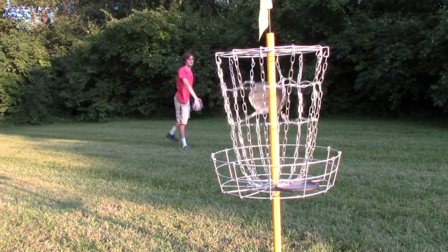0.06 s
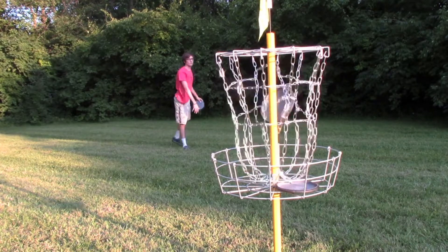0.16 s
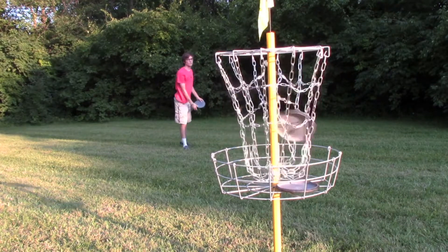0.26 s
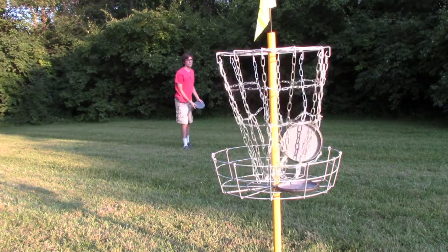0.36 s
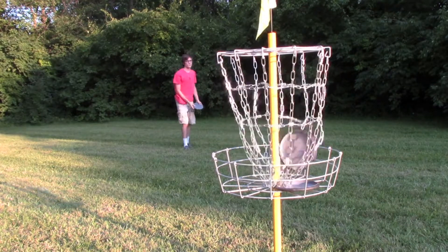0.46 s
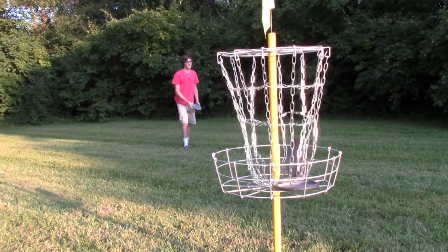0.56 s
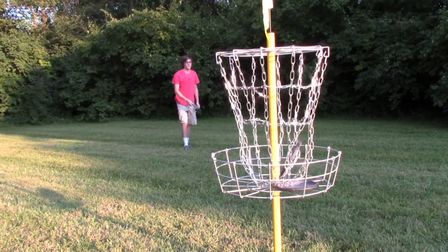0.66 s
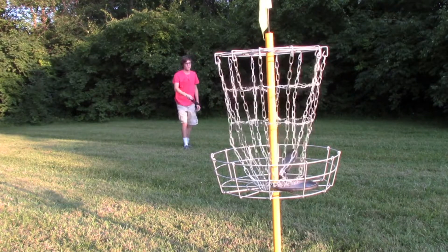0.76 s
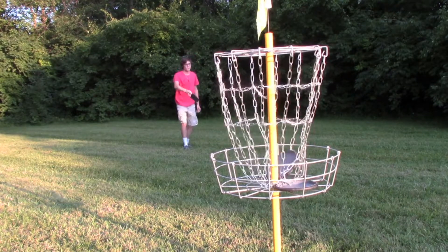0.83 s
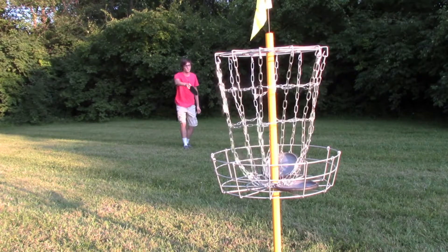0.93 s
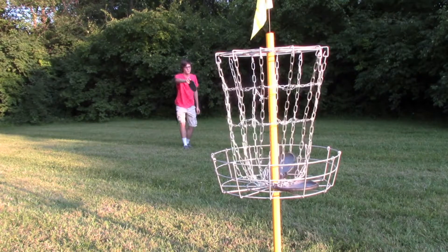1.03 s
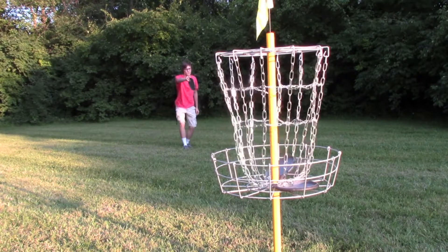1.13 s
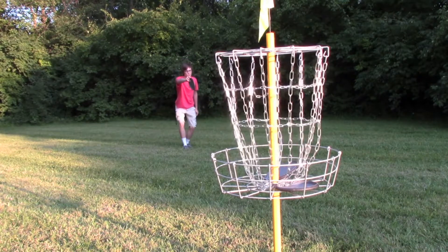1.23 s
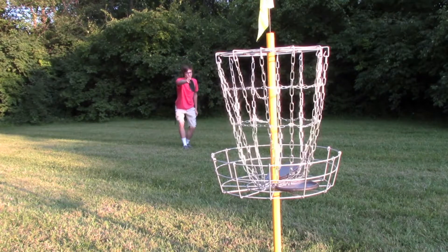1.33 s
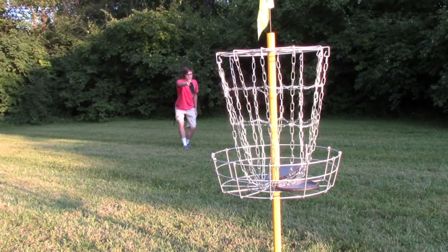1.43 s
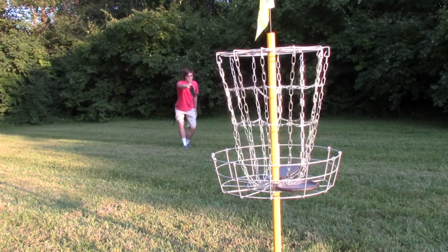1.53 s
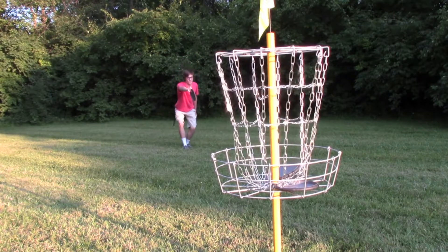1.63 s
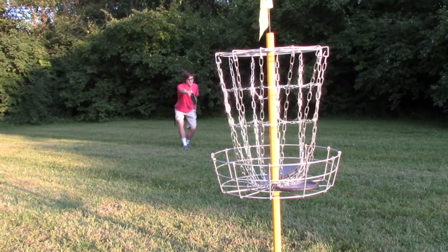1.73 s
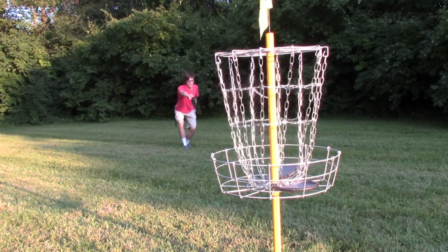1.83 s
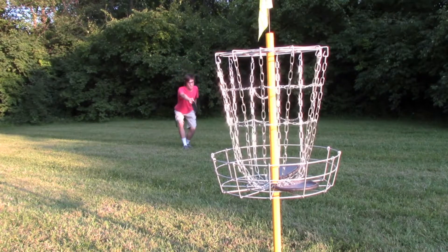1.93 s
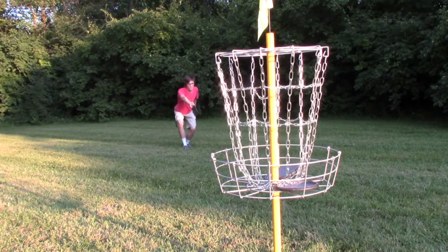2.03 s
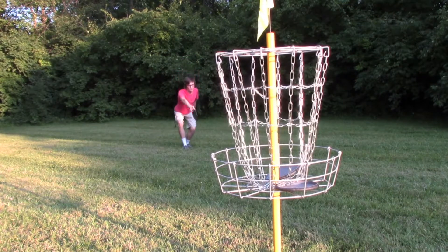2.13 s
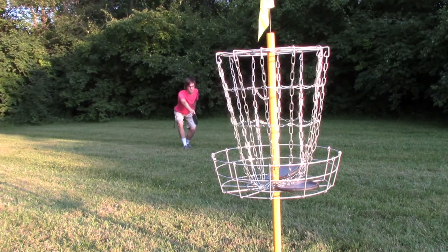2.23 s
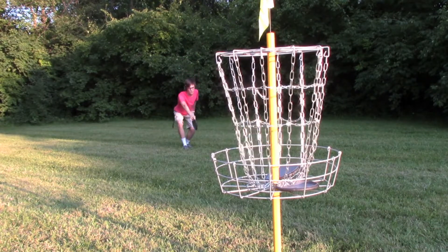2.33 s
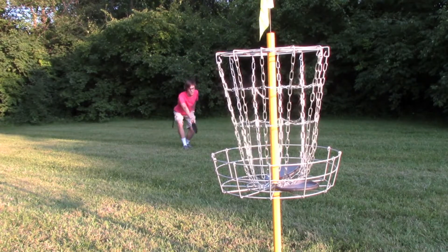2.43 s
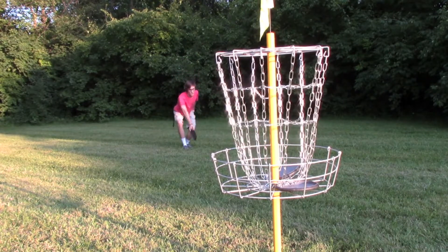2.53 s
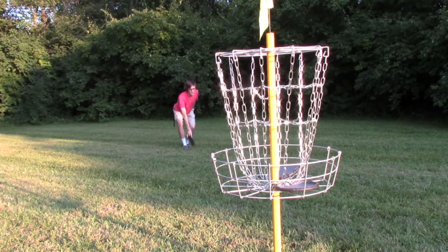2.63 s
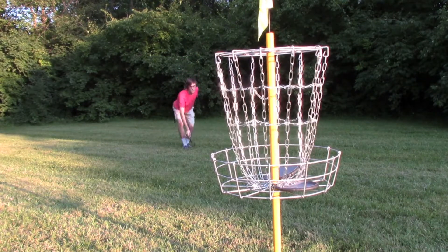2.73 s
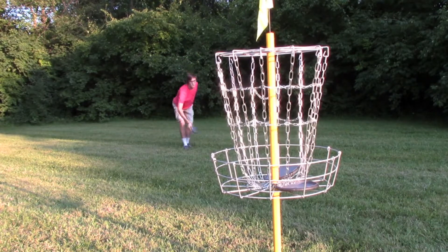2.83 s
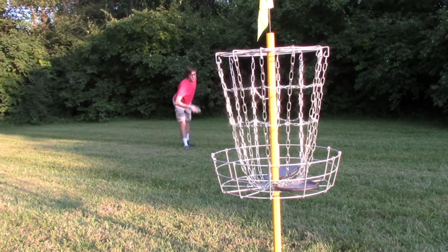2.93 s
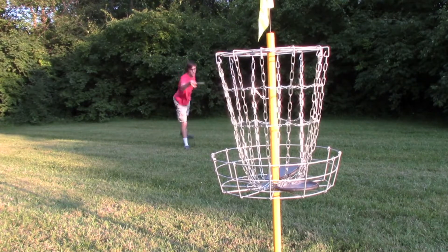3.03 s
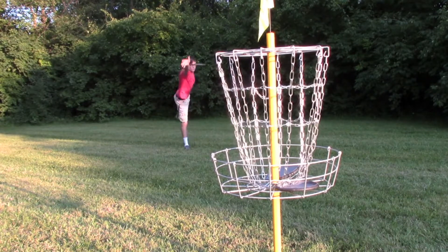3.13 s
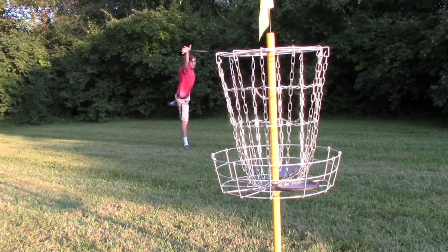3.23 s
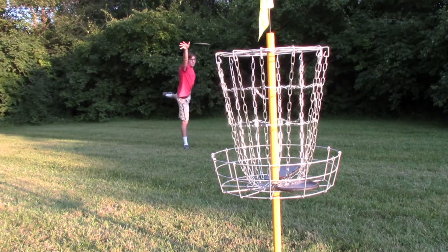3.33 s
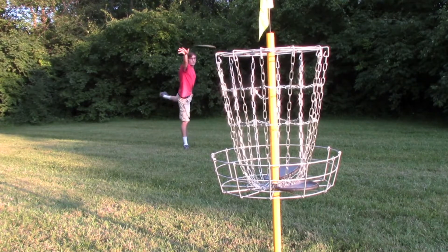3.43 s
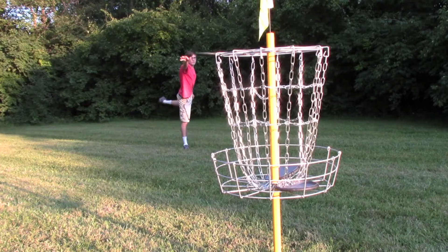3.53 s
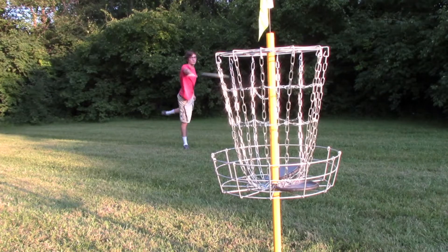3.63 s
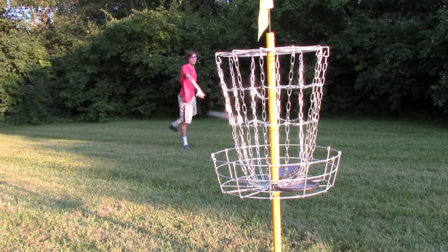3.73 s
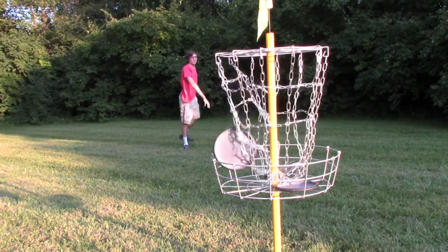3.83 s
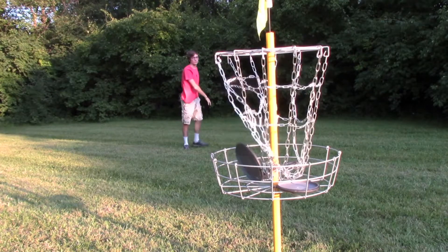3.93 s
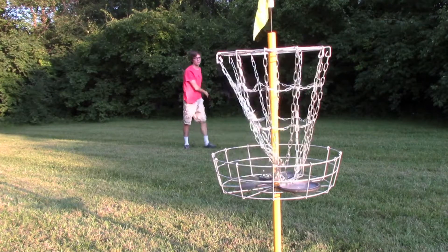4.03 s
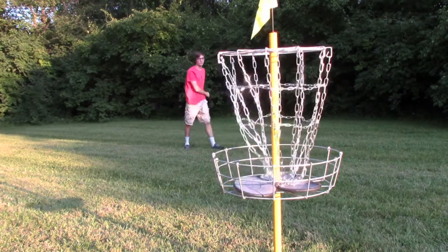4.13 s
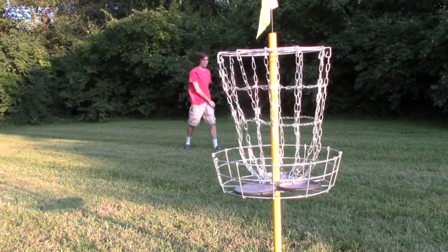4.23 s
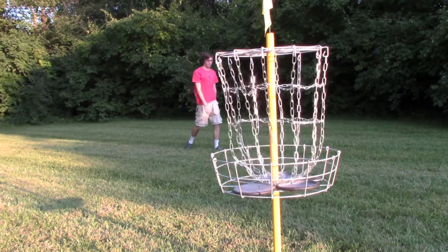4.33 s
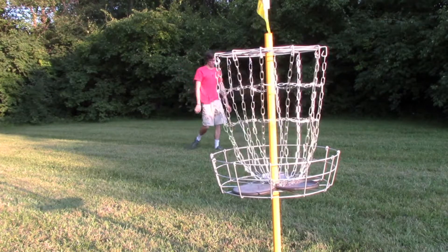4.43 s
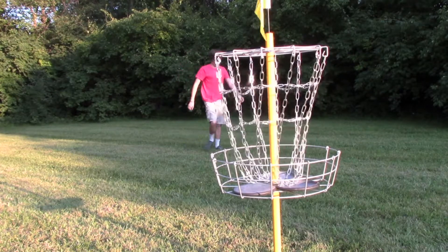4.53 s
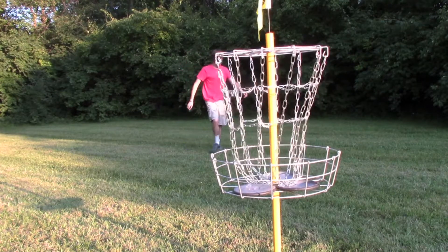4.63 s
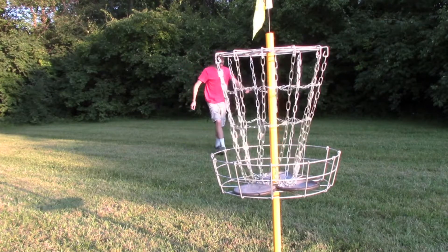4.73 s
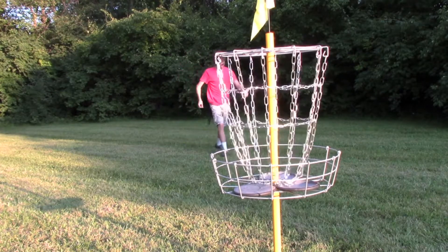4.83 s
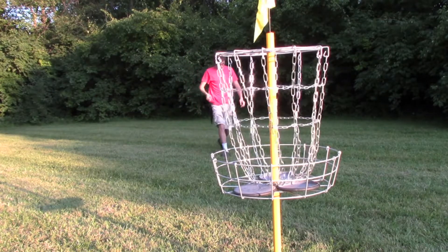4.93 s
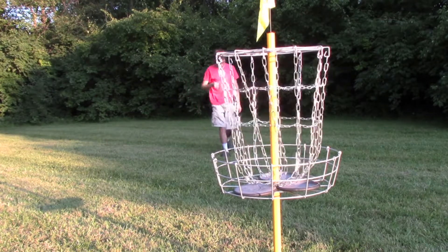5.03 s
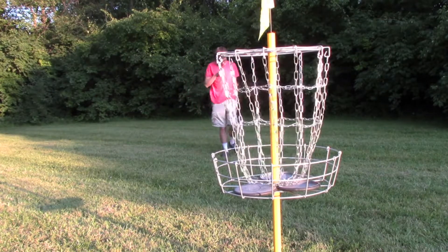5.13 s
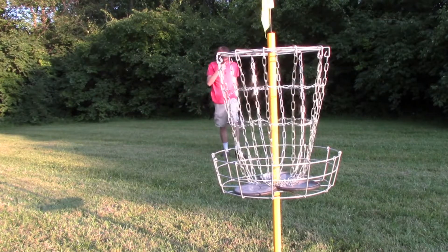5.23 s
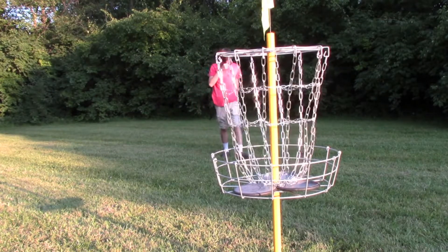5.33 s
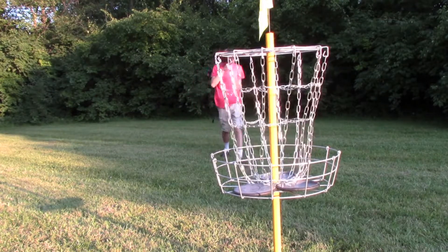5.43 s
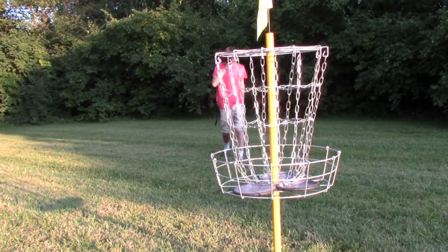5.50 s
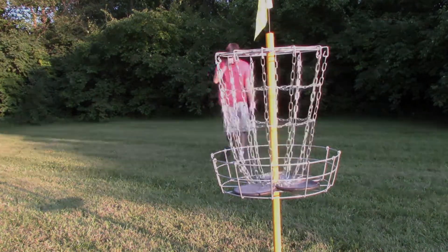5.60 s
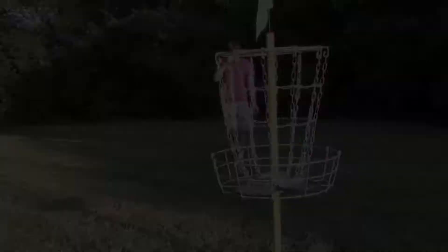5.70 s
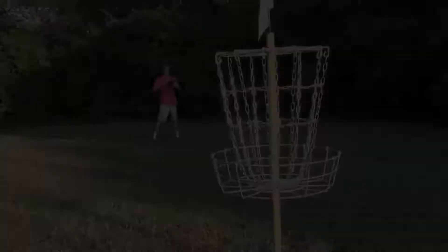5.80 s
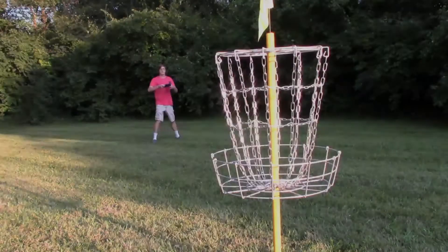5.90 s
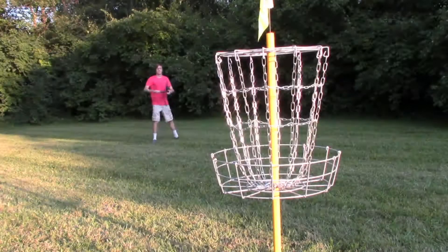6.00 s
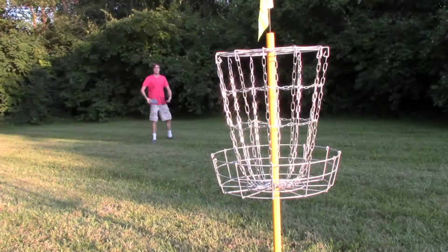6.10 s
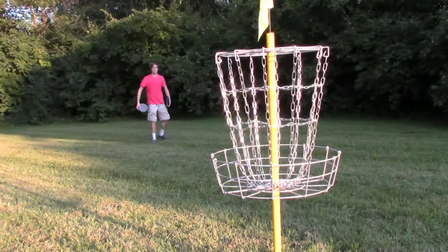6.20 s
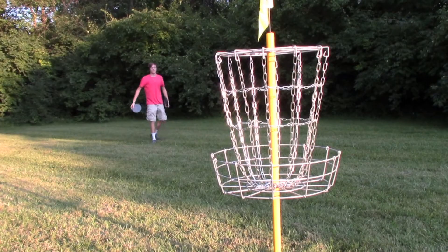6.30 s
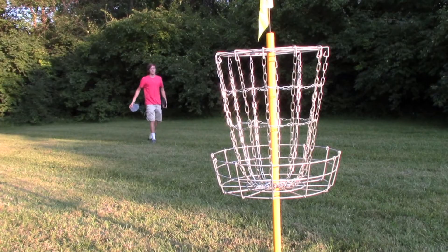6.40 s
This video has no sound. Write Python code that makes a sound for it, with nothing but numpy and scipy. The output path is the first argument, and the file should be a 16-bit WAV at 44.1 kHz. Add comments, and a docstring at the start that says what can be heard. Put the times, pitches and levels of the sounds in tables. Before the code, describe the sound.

Close outdoor perspective beside a metal chain basket: a disc slaps in almost at once, with hollow plastic knocks, a rush of jingling links and a high ringing metal hoop. Stray clinks slow and fade into pulsing insect buzz and soft distant rumble. A second disc crashes in, knocks down into the tray, and the chains clatter on irregularly. Finally the sound dips out for a moment, then only insects remain.

```python
"""A plastic disc slaps the chains of a steel disc-golf basket on a summer field; a second one follows.
The chains are showers of randomly excited link modes; the ring that gathers them clangs on the pole,
and both ring as sums of decaying sinusoids. Discs are damped thuds with noise slaps, rakes are sparse noise.
Stray links clink as the chains settle, over pulsed-noise insects and a far rumble of filtered noise."""
import sys
import numpy as np
from scipy import signal
from scipy.fft import rfft, irfft
from scipy.io import wavfile
from scipy.ndimage import uniform_filter1d

SR = 44100
rng = np.random.default_rng(int(sys.argv[2]) if len(sys.argv) > 2 else 0)


def generate_wav(signal):
    """Clip the signal to [-1, 1] and save it as 16-bit WAV at the path in sys.argv[1]."""
    frames = np.transpose(np.atleast_2d(signal))
    scaled = np.clip(frames, -1, 1) * 32767
    pcm = np.round(scaled).astype(np.int16)
    wavfile.write(sys.argv[1], SR, pcm)


N = 284877
T = np.arange(N) / SR

# Levels in the tables are relative: each source applies its own gain.
# The ring meets the pole:
# (time [s], clang level [dB], hum level [dB], shimmer level [dB], pole level [dB])
CLANGS = [(0.133, -7.5, -24, -11, -21), (0.175, -6.5, -26, -14, -22), (0.218, -7, -22, -8.5, -20),
          (0.2884, -3.5, -25, -9, -21.5), (0.3724, -5.5, -30, -11.5, -19), (0.4346, -6.5, -31.5, -10, -16),
          (0.483, -10, -21, -15, -33), (0.518, -5, -20.5, -19.5, -20), (0.587, -10.5, -23, -28, -19.5),
          (3.7735, -6.5, -20, -9.5, -27.5), (3.82, -6.5, -16, -17, -32.5),
          (3.8744, -6.5, -14, -17.5, -27.5), (3.95, -14.5, -18.5, -17.5, -43.5),
          (4.013, -7.5, -26, -13, -20), (4.1152, -12.5, -34, -12.5, -19.5), (4.1844, -18, -33.5, -28, -20),
          (4.2494, -21.5, -32.5, -26, -24), (4.5014, -12.5, -41, -24, -13), (4.6023, -16, -39, -34, -37)]
# Bending modes of the ring, each split into close, beating tones: (frequency [Hz], level [dB], t60 [s])
HUM_MODES = [(1966, 0, 2.9), (1990, -5, 2.9)]
CLANG_MODES = [(5546, -1, .6), (5566, -10, .8), (5587, -4, .75), (5615, -3, .8), (5649, -9, .7),
               (5696, -10, .7), (5745, -17, .5), (5800, -20, .4)]
SHIMMER_MODES = [(10698, -3, .35), (10729, -2, .35), (10765, -4, .35), (10882, -8, .5), (10972, -10, .4),
                 (11084, -10, .35), (11208, -14, .3)]
# The hum's upper twin varies about half as much in dB as the hum itself:
# level at full hum [dB], slope [dB per dB of hum]
TWIN_DB, TWIN_SLOPE = -10, 0.54
# Modes of the steel pole: (frequency [Hz], level [dB], t60 [s])
POLE_MODES = [(2121, -12, .8), (2379, -11, .5), (3386, 0, .3), (4124, -2, .32), (4985, -5, .3),
              (5890, -5, .2), (6078, -6, .3), (6275, -10, .33), (6589, -4, .3), (6928, -3, .26),
              (7368, -4, .2), (7860, -1, .17), (8050, -6, .22), (8400, -4, .3), (8965, -4, .15),
              (9615, -12, .15), (10341, -9, .13), (11547, -10, .13), (12010, -11, .12)]

# A chain snaps tight and stirs its neighbours:
# (time [s], jingle level [dB], clatter level [dB], t60 of the stir [s])
CLINKS = [(0.586, -12.5, -17.5, .2), (0.703, -12.5, -18, 1), (0.76, -9, -20, 0.14), (0.829, -28, -35, 0.15),
          (0.936, -16, -33, 0.41), (1.122, -18.5, -26.5, 1), (1.17, -19, -27, .5), (1.259, -20, -34, 0.17),
          (1.3016, -32, -50, .3), (1.466, -16.5, -33, 0.18), (1.7288, -34, -45, 0.34),
          (1.7697, -30.5, -37, 0.22), (1.845, -25, -33.5, 0.33), (1.9293, -32.5, -32, 0.22),
          (2.093, -29.5, -36.5, 0.18), (2.225, -30, -33.5, 0.22), (2.345, -35, -40, 0.45),
          (2.8563, -33.5, -39, .2), (4.1841, -5, -20, 0.22), (4.317, -11, -24.5, 0.33),
          (4.3527, -13.5, -22.5, 0.28), (4.4082, -18.5, -28, 0.23), (4.4995, -15, -22.5, .25),
          (4.602, -9.5, -20, .3), (4.7263, -22.5, -34, 0.6), (4.8185, -20.5, -23.5, .9),
          (4.9168, -16, -24.5, 0.1), (5.164, -29.5, -35.5, 0.14), (5.234, -18.5, -30.5, 0.45),
          (5.5245, -35, -39, 0.69)]
# The stir, relative to its clink [dB]
STIR_DB, STIR_CLATTER_DB = -24.5, -8
# Faint stray clinks as the chains settle: (start [s], end [s], jingle level [dB], clatter level [dB])
SETTLING = [(1.999, 3.05, -42.5, -41.5), (5.295, 5.55, -40.5, -40.5)]
STRAYS_PER_S, STRAY_SPREAD_DB = 7, 0.5
# Tones that all links share, roughly: (frequency [Hz], level [dB])
LINK_MODES = [(1590, 1), (1740, 0.5), (2830, -4.5), (3000, -13), (3470, 3), (3750, 1.5), (4450, 3.5),
              (7400, -3), (8200, -8), (8395, 8.5), (8770, 0), (10900, 4), (13330, 9.5), (13780, -4)]
# Spectra of the bright jingle, dull clatter, hard-contact edge and lone clink: (frequency [Hz], level [dB])
BRIGHT_SPECTRUM = [(4500, -29), (6500, 6.5), (7800, 7), (8500, 0.5), (9400, 2.5), (11300, -4.5),
                   (12800, -14), (15000, -13.5), (16000, -18.5)]
DULL_SPECTRUM = [(80, -60), (250, -9), (600, -5.5), (850, 1.5), (1200, -5), (1600, 1.5), (2100, 0),
                 (2800, 3.5), (3700, 0), (5000, -2.5), (7500, 5), (10000, -33)]
EDGE_SPECTRUM = [(6000, -34), (9500, 0), (11800, 4), (13300, -15.5), (15000, -4.5), (16000, -18)]
CLINK_SPECTRUM = [(4500, -31.5), (6500, -9), (7800, 5.5), (8500, 1), (9400, 1.5), (11300, -5),
                  (12800, -8.5), (15000, -10), (16000, -14)]
# Instants at which a throw sets the chains shaking: (time [s])
THROW_TIMES = [0.058, 3.726]
# The shaking after each throw: (level [dB], hold [s], fall [dB/s])
THROWS = [(-27.5, 0.48, 35), (-28.5, .52, 82)]
# The chains swing together and apart; the shaking swells once a swing
SWING_S, SWING_DB, SHAKE_ATTACK_S = 0.39, 1, .02
# Clatter fades more slowly than jingle: level at full shake [dB], slope [dB per dB of shake]
CLATTER_DB, CLATTER_SLOPE = -15, .55
# A link swings free and rings one clear tone: (time [s], frequency [Hz], level [dB], t60 [s])
PINGS = [(0.757, 8200, -27.5, 0.16), (0.758, 1583, -26, 0.11), (1.26, 8320, -26, 0.093),
         (4.316, 8420, -20.5, 0.27), (4.352, 8410, -20, 0.26), (4.916, 4460, -27, 0.16),
         (5.236, 1550, -38, 0.17)]

# The flying disc rakes across the chains: (time [s], level [dB], t60 [s])
RAKES = [(0.059, -16, 0.21), (0.098, -14, 0.6), (3.726, -19, 0.066), (3.7405, -16, 0.49)]
# Spectrum of a rake: (frequency [Hz], level [dB])
RAKE_SPECTRUM = [(3000, -14.5), (5500, -6), (7000, 1), (8500, -1), (10200, 1.5), (11800, -4),
                 (13300, -17.5), (15000, -12)]
# A disc strikes chains or tray: (time [s], thud level [dB], slap level [dB], thud pitch [Hz])
DISCS = [(0.057, -31.5, -17, 677), (0.073, -14.5, -22, 494), (0.096, -7.5, -14.5, 507),
         (0.141, -30, -29.5, 473), (0.217, -29.5, -32.5, 497), (0.515, -16, -25.5, 522),
         (3.725, -38.5, -18.5, 670), (3.74, -28, -21.5, 547), (3.785, -24.5, -24.5, 502),
         (4.004, -20, -45.5, 263)]
# Nominal modes of the disc's body: (multiple of thud pitch [1], level [dB], t60 [s])
DISC_MODES = [(.8, -12, 0.18), (1.002, 13, .08), (1.2, -13.5, 0.022), (1.701, -3.5, 0.12)]
# Spectrum of the slap: (frequency [Hz], level [dB])
SLAP_SPECTRUM = [(80, -69.5), (280, -12.5), (550, -10.5), (900, -0.5), (1400, -4), (2000, -6), (2900, -3.5),
                 (4500, -10), (9000, -29)]
# A disc tumbles down the chains in soft knocks, loudest midway:
# (time [s], length [s], thud level [dB], slap level [dB], thud pitch [Hz])
TUMBLES = [(0.279, .14, -19.5, -26, 515), (3.973, 0.107, -19.5, -28.5, 540)]
# Mean spacing, timing spread, pitch spread (natural log) and base taper at the ends of a tumble
KNOCK_GAP_S, KNOCK_JITTER_S, KNOCK_PITCH_SPREAD, KNOCK_TAPER_DB = .032, 0.0024, .12, 4

# Spectra of the insects and the open field: (frequency [Hz], level [dB per Hz])
INSECT_SPECTRUM = [(3900, -35), (4500, -16.5), (5000, -9), (5500, -11), (5750, -4), (6250, -2.5),
                   (6850, -10.5), (7300, -9), (7900, -16), (8600, -31), (12000, -33), (16000, -37)]
FIELD_SPECTRUM = [(15, -77), (25, -36), (59, -13.5), (117, -2), (227, -4.5), (264, -8.5), (406, -11.5),
                  (442, -12), (472, -7), (548, -11), (999, -10), (1260, -14), (1600, -16.5), (2110, -23.5),
                  (4200, -34), (5460, -46.5), (9240, -120)]
INSECTS_DB, FIELD_DB = -48, -45
# Gain of the sample-to-sample slope that sets the two channels apart [dB]
RING_SIDE_DB, BASKET_SIDE_DB = -26.5, -47
# The level dips briefly: (time [s], gain [1])
FADE = [(5.6, 0.96), (5.83, 0.0072), (6.06, 0.86)]
TOP_HZ = 15750


def amp(db):
    """Decibel law: 20 dB are a factor of ten in amplitude."""
    return 10 ** (np.asarray(db) / 20)


def unit(x):
    """Normalisation: scale to an rms of 1."""
    return x / np.sqrt(np.mean(x ** 2))


def decay(t, t60):
    """Exponential damping: fall by 60 dB in t60 seconds."""
    return np.exp(-np.log(1000) * t / t60)


def colour(x, points):
    """Minimum-phase filtering: a folded cepstrum turns (Hz, dB) points into a causal response."""
    size = 4096
    hz, db = np.transpose(points)
    bins_hz = np.arange(size // 2 + 1) * SR / size
    gain = amp(np.interp(np.log(bins_hz + 1), np.log(hz), db))
    cepstrum = irfft(np.log(gain))[:size // 2]
    cepstrum[1:] *= 2
    response = irfft(np.exp(rfft(cepstrum, size)))
    return signal.fftconvolve(x, response)[:len(x)]


def highpass(x, hz):
    """Radiation efficiency: small bodies radiate little bass."""
    return signal.sosfilt(signal.butter(3, hz, "high", fs=SR, output="sos"), x)


def walk(rate):
    """Band-limited fluctuation: smoothed random steps with a spread near 1."""
    k = int(SR / rate)
    steps = np.repeat(rng.standard_normal(N // k + 1), k)
    return uniform_filter1d(steps, k)[:N] * np.sqrt(3 / 2)


def add(out, s, sound):
    """Superposition: mix a sound in at a given time."""
    i = int(s * SR)
    out[i:i + len(sound)] += sound[:N - i]


def struck(times, blow_db, modes, kick, chatter):
    """Modal re-excitation: each contact restarts the swing and shifts its phase; riding links add chatter."""
    out = np.zeros(N)
    blow = np.maximum(np.searchsorted(times, T) - 1, 0)
    age = np.maximum(T - times[blow], 0)
    for hz, db, t60 in modes:
        level = amp(blow_db + db)[blow] * decay(age, t60) * (T > times[0])
        swing = uniform_filter1d(level, size=90)  # about 2 ms: softens the joins
        shifts = np.cumsum(kick * rng.standard_normal(len(times)))
        phase = uniform_filter1d(shifts[blow], size=90)
        phase += chatter * walk(420) * decay(age, 1.2)
        out += swing * np.sin(2 * np.pi * (hz * T + rng.random()) + phase)
    return out


def steel_ring():
    """Bending vibration of a ring: split modes beat, and the lowest tones sing on longest."""
    s, clang_db, hum_db, shimmer_db, _ = np.transpose(CLANGS)
    hum = struck(s, hum_db + 1.5, HUM_MODES[:1], kick=.35, chatter=.06)
    twin = struck(s, TWIN_DB + TWIN_SLOPE * hum_db, HUM_MODES[1:], kick=.35, chatter=.06)
    clang = struck(s, clang_db - 6.5, CLANG_MODES, kick=0.74, chatter=0.2)
    shimmer = struck(s, shimmer_db - 1.5, SHIMMER_MODES, kick=1.1, chatter=0.3)
    return hum + twin + clang + shimmer


def pole():
    """Linear impulse response: blows, each with a brief scrape, excite modes that add up and die away."""
    force, tube, t = np.zeros(N), np.zeros(SR), np.arange(SR) / SR
    for s, *_, db in CLANGS:
        contact = 0.017 * rng.standard_normal(len(t)) * decay(t, 0.42)
        contact[0] += 1
        add(force, s, amp(db - 4.5) * contact)
    for hz, db, t60 in POLE_MODES:
        tube += amp(db) * decay(t, t60) * np.sin(2 * np.pi * (hz * t + rng.random()))
    ringing = signal.oaconvolve(force, highpass(tube, 1500))[:N]
    # chains lying against the tube roughen its tones
    return np.real(signal.hilbert(ringing) * np.exp(.25j * walk(350)))


def link(t60, tick, detune, count):
    """Modal sum: shared tones, many of the link's own, and a noisy tick of contact."""
    t = np.arange(SR // 5) / SR
    hz, db = np.transpose(LINK_MODES)
    shared_hz = hz * (1 + detune * rng.standard_normal(len(hz)))
    hz = np.r_[shared_hz, rng.uniform(600, 16000, count)]
    size = np.r_[amp(db), np.ones(count)] * rng.rayleigh(1, len(hz))
    sign = rng.choice([-1, 1], len(hz))
    life = t60 * np.exp(0.62 * rng.standard_normal(len(hz)))
    modes = decay(t, life[:, None]) * np.sin(2 * np.pi * hz[:, None] * t)
    ring = (size * sign) @ modes
    crack = rng.standard_normal(len(t)) * decay(t, 0.022)
    return ring / np.linalg.norm(ring) + tick * crack / np.linalg.norm(crack)


def rattle(links, rate, spread_db):
    """Random impact process: dense contacts at a constant mean rate, shared among the links."""
    out = np.zeros(N)
    for ring in links:
        contacts = rng.random(N) < rate / SR / len(links)
        strength = amp(spread_db * np.clip(rng.standard_normal(N), -2, 2))
        out += signal.oaconvolve(contacts * strength, ring)[:N]
    return out


def voiced(x, points, size=2600):
    """Local power normalisation: colour a rattle and even out its slow swells."""
    y = colour(x, points)
    return y / np.sqrt(np.abs(uniform_filter1d(y ** 2, size)) + 1e-12)


def shaking():
    """Damped agitation: each throw holds, then dies away in swings; each clink adds a short stir."""
    shake = np.zeros(N)
    for s, (db, hold, fall) in zip(THROW_TIMES, THROWS):
        age = np.maximum(T - s, 0)
        swing = SWING_DB * np.cos(2 * np.pi * age / SWING_S)
        attack = np.minimum(age / SHAKE_ATTACK_S, 1)
        shake += attack * amp(db + swing - fall * np.maximum(age - hold, 0))
    jingle, clatter = shake, amp(CLATTER_DB) * shake ** CLATTER_SLOPE
    for s, jingle_db, clatter_db, t60 in CLINKS:
        stir = (T > s) * decay(np.clip(T - s, 0, 2), t60)
        # independent rattles add in power
        jingle = np.hypot(jingle, amp(jingle_db + STIR_DB) * stir)
        clatter = np.hypot(clatter, amp(clatter_db + STIR_CLATTER_DB) * stir)
    return jingle, clatter


def strays():
    """Jittered sequence: times and levels of the faint clinks of settling chains."""
    rows = []
    for start, end, *levels in SETTLING:
        for s in np.arange(start, end, 1 / STRAYS_PER_S):
            late = rng.random() / STRAYS_PER_S / 2
            spread = STRAY_SPREAD_DB * rng.standard_normal()
            rows.append((s + late, *(np.array(levels) + spread)))
    return rows


def chains(count=30):
    """Many-body impact: a shower of contacts while the chains shake, and lone clinks that bounce."""
    links = [link(t60=0.11, tick=0.29, detune=.009, count=48) for _ in range(count)]
    shower = rattle(links, rate=220, spread_db=6)
    bright = voiced(shower, BRIGHT_SPECTRUM)
    dull = voiced(shower, DULL_SPECTRUM)
    edge = voiced(shower, EDGE_SPECTRUM)
    jingle, clatter = shaking()
    out = amp(2.5) * bright * jingle ** 0.94 + dull * clatter
    # harder contacts are shorter, so the top grows faster than the rest
    out += amp(12.5) * edge * jingle ** 1.415
    for s, jingle_db, clatter_db, *_ in CLINKS + strays():
        clink = np.zeros(SR // 3)
        delays = np.r_[0, np.cumsum(rng.uniform(.002, .016, size=4))]
        for bounce, delay in enumerate(delays):
            ring = links[rng.integers(count)]
            i = int(delay * SR)
            clink[i:i + len(ring)] += amp(-4 * bounce) * ring[:len(clink) - i]
        add(out, s, amp(jingle_db - 27.0) * unit(colour(clink, CLINK_SPECTRUM)))
        add(out, s, amp(clatter_db - 19.0) * unit(colour(clink, DULL_SPECTRUM)))
    return out


def pings():
    """Free vibration: links swinging free each ring with a clear tone that dies away quickly."""
    out, t = np.zeros(N), np.arange(SR // 2) / SR
    for s, hz, db, t60 in PINGS:
        add(out, s, amp(db) * decay(t, t60) * np.sin(2 * np.pi * hz * t))
    return out


def rakes():
    """Damped multiple impact: dozens of links hit at once, muted by the plastic, crash densely and dryly."""
    out, t = np.zeros(N), np.arange(SR // 4) / SR
    for s, db, t60 in RAKES:
        grains = rng.standard_normal(len(t)) * (rng.random(len(t)) < .06)
        add(out, s, amp(db) * unit(colour(grains, RAKE_SPECTRUM)) * decay(t, t60))
    return highpass(out, 400)


def knocks():
    """Irregular impact series: the loosely spaced knocks of a tumbling disc."""
    rows = []
    for s, length, thud_db, slap_db, hz in TUMBLES:
        for age in np.arange(0, length, KNOCK_GAP_S):
            late, sharp = rng.standard_normal(2)
            time = s + age + KNOCK_JITTER_S * late
            taper = KNOCK_TAPER_DB * (2 * age / length - 1) ** 2
            pitch = hz * np.exp(KNOCK_PITCH_SPREAD * sharp)
            rows.append((time, thud_db - 2 * taper, slap_db - taper / 2, pitch))
    return rows


def discs():
    """High internal damping: soft plastic gives a low thud from the body and a short slap from the rim."""
    out, t = np.zeros(N), np.arange(SR // 5) / SR
    for s, thud_db, slap_db, hz in DISCS + knocks():
        thud = np.zeros(len(t))
        for ratio, db, t60 in DISC_MODES:
            mode_hz = hz * ratio * (1 + 0.069 * rng.standard_normal())
            thud += amp(db) * decay(t, t60) * np.sin(2 * np.pi * mode_hz * t)
        slap = colour(rng.standard_normal(len(t)) * decay(t, 0.093), SLAP_SPECTRUM)
        add(out, s, amp(thud_db - 23) * unit(thud) + amp(slap_db - 10.5) * unit(slap))
    return highpass(out, 200)


def scatter(x, t60, db):
    """Diffuse scattering: grass and trees throw back a faint, decaying noise tail."""
    t = np.arange(SR) / SR
    tail = colour(rng.standard_normal(len(t)) * decay(t, t60), [(3000, -7.5), (14000, 16.5)])
    return amp(db) * signal.oaconvolve(x, tail / np.linalg.norm(tail))[:N]


def insects(count=5):
    """Amplitude-modulated noise: each singer of the chorus buzzes at its own pulse rate."""
    out = np.zeros(N)
    for rate in rng.uniform(105, 260, count):  # pulses per second
        phase = np.cumsum(rate * (1 + 0.0099 * walk(2.7))) / SR
        pulses = np.exp(-(phase % 1) / 1.4)
        out += rng.standard_normal(N) * pulses * amp(1.5 * walk(1.4))
    return amp(INSECTS_DB) * unit(colour(out, INSECT_SPECTRUM))


def field():
    """Filtered broadband noise: far rumble and the rustle of open air, gently wavering."""
    level = amp(FIELD_DB + 1.1 * walk(6.5))
    return level * unit(colour(rng.standard_normal(N), FIELD_SPECTRUM))


def scene():
    """Sum and difference: the basket reaches the right channel a hair before the left, amid a wide field."""
    ring = steel_ring()
    basket = ring + pole() + chains() + pings() + rakes() + discs()
    mid = basket + scatter(basket, t60=0.69, db=-25.0) + insects() + field()
    # subtracting a little slope delays a wave; adding it advances the wave
    lag = -np.gradient(amp(RING_SIDE_DB) * ring + amp(BASKET_SIDE_DB) * basket)
    side = lag + amp(-19.5) * field() + amp(-11.5) * insects()
    return np.array([mid + side, mid - side])


def record(dry):
    """Saturation and band limiting: the level dips briefly, peaks are rounded and the top is cut."""
    faded = dry * np.interp(T, *np.transpose(FADE))
    rounded = np.tanh(.85 * faded) / .85
    lowpass = signal.ellip(8, .2, 70, TOP_HZ, fs=SR, output="sos")
    return signal.sosfilt(lowpass, rounded)


dry = scene()
out = record(dry)
generate_wav(out)
```